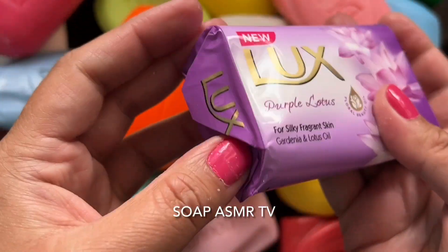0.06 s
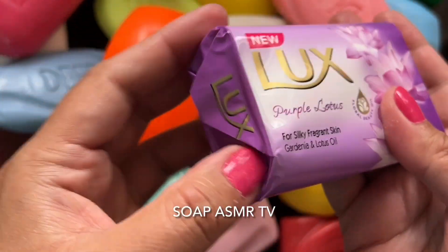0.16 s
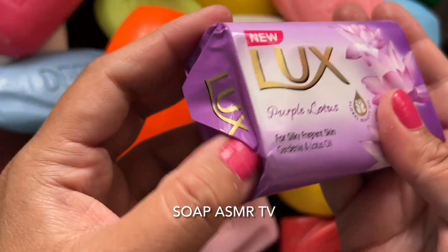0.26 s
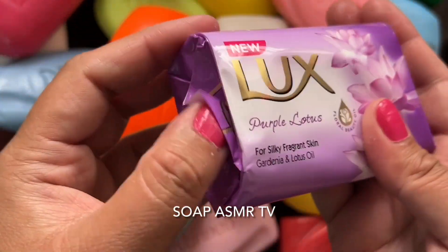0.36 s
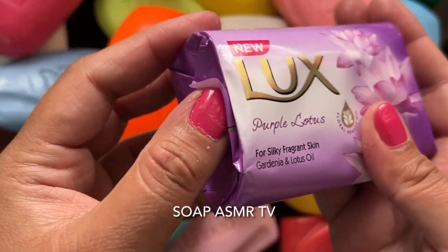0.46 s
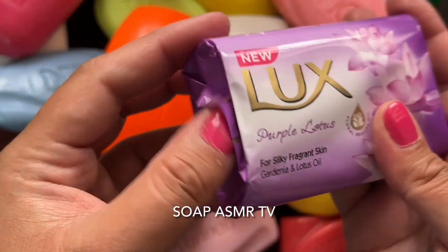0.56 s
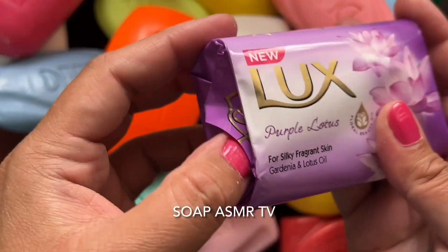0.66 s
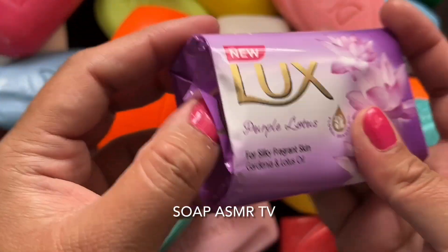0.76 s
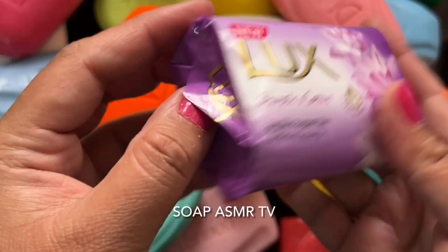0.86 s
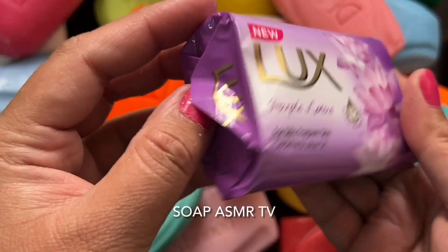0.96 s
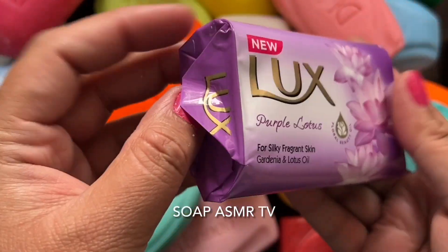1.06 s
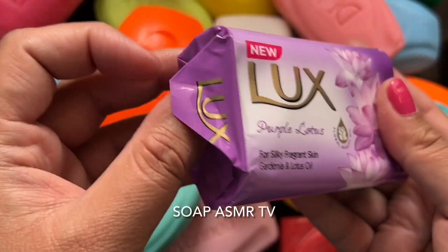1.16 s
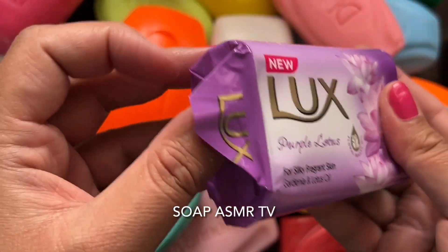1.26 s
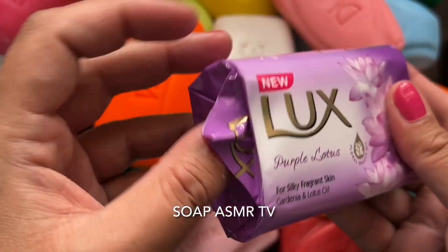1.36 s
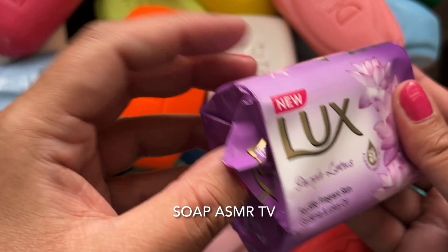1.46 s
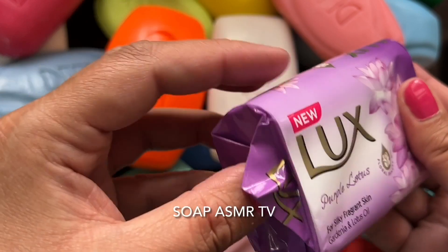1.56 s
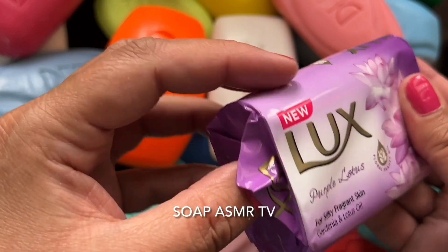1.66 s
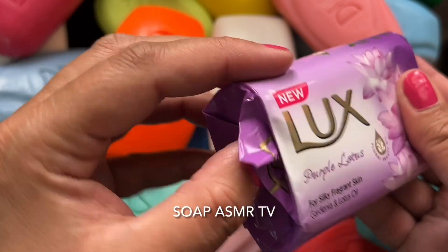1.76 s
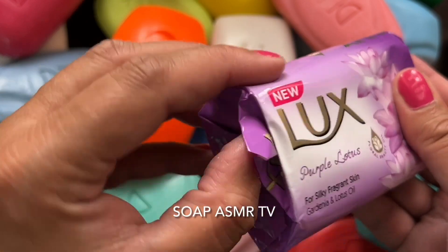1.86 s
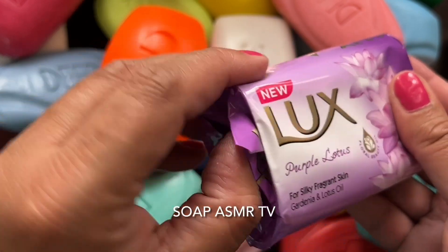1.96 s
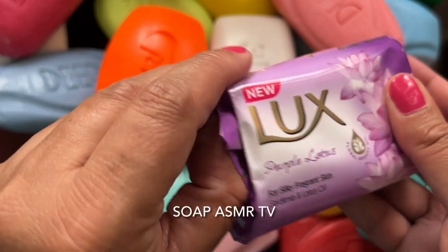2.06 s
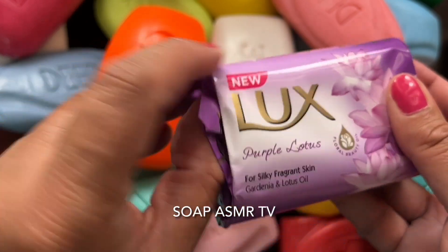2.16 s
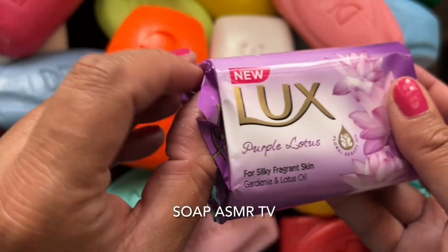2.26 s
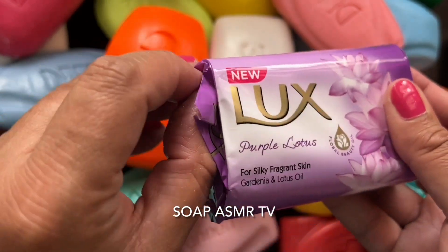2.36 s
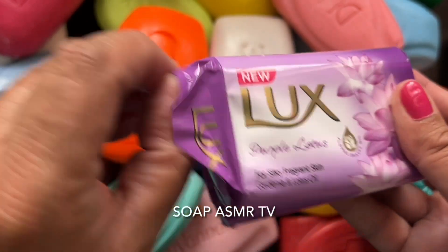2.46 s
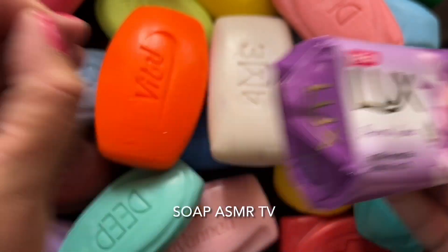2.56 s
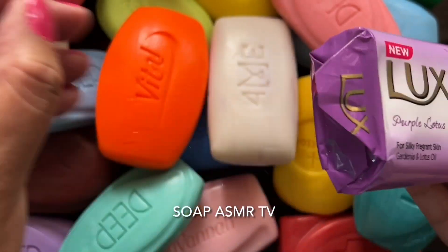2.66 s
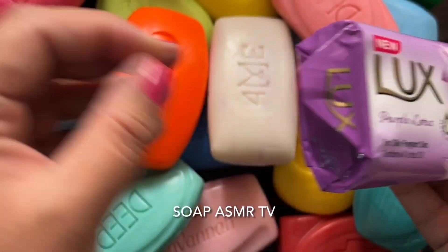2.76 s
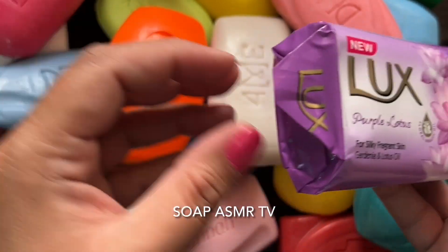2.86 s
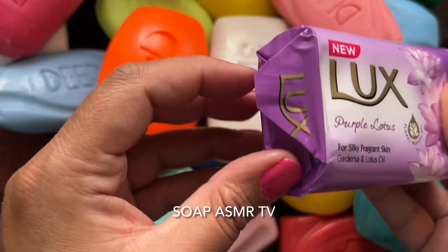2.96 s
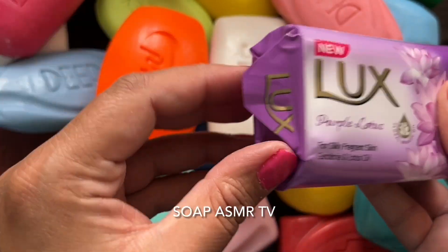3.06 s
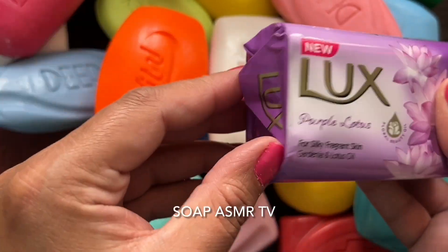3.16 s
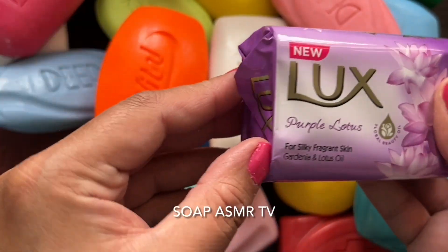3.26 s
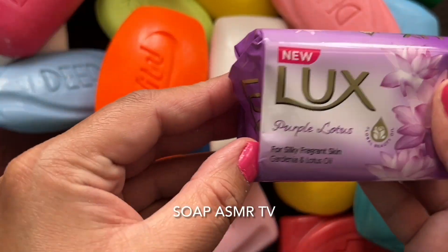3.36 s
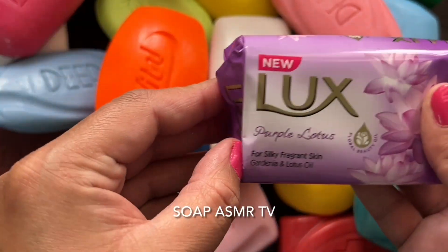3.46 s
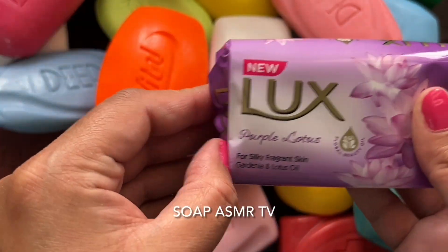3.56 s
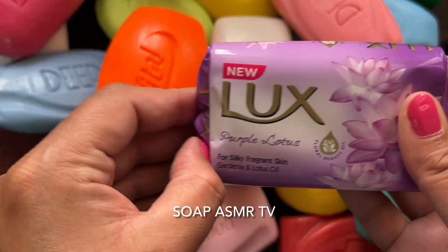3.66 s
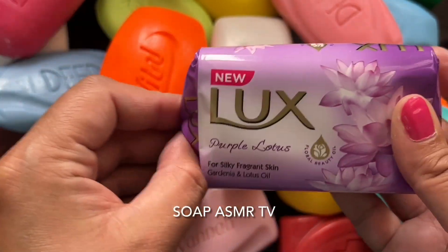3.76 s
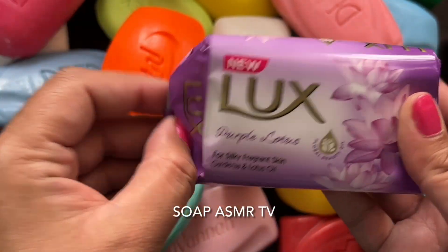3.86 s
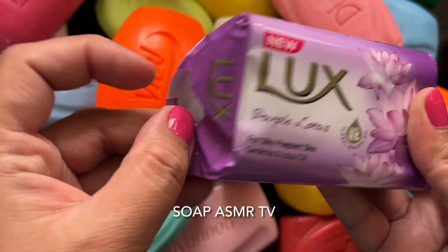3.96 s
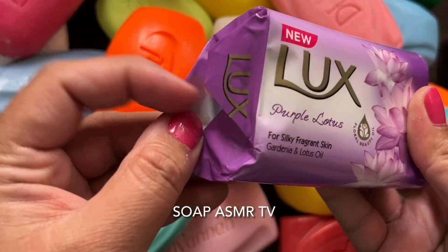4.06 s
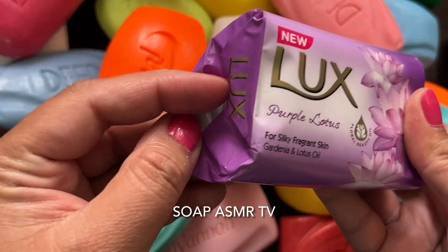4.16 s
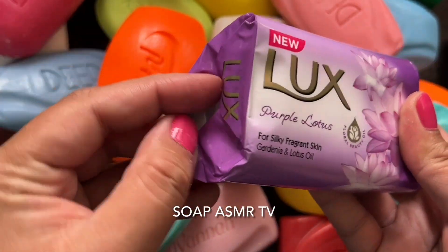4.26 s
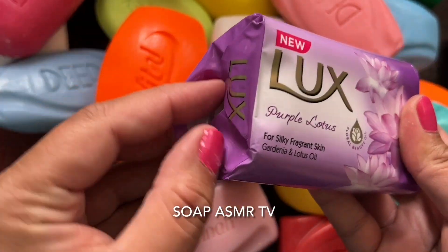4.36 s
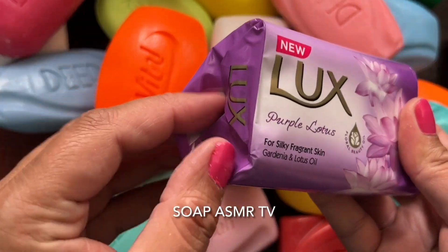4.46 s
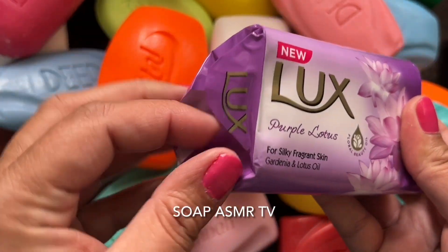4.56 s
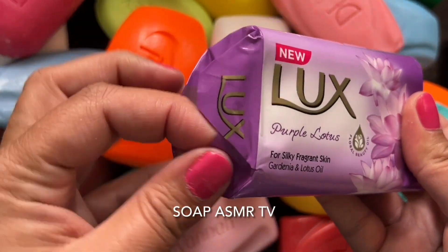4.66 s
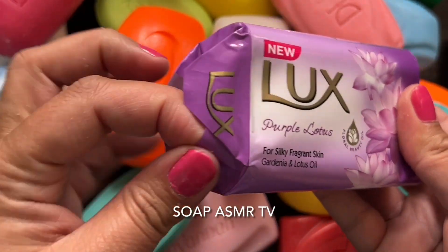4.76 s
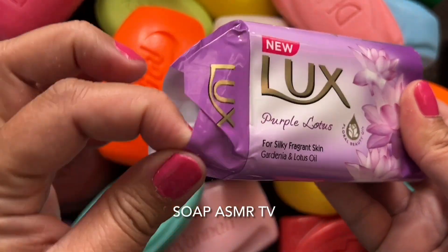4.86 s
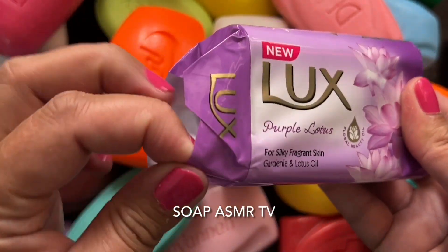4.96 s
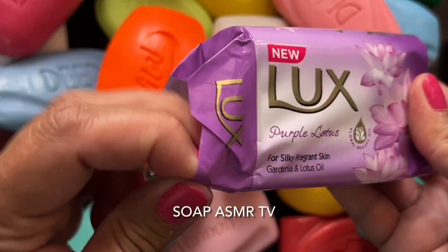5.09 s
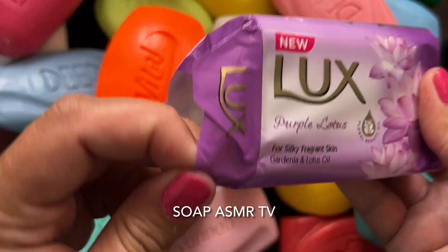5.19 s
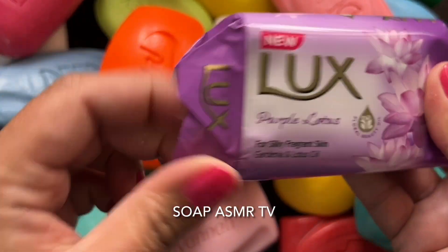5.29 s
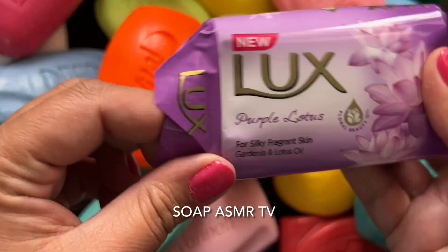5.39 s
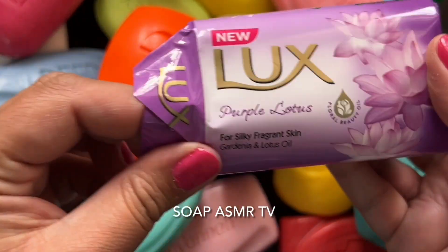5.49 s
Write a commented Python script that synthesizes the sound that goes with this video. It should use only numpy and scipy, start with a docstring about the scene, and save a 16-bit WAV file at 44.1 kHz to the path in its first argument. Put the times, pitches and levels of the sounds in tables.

```python
"""Opening a stiff wrapper

Fingers work open the folded end of a stiff paper and plastic wrapper, close to a two-port microphone.
Creases buckle as noise bursts ringing panel and thud resonances; the flexing sheet rustles in tiny filtered grains.
Seams rip in dense grains, folds crackle, banded noise swells brush by or trail a loud snap, the bar bumps as low modes.
A small hard room adds a decaying noise tail over a low noise rumble; the loudest peaks overload the recorder."""
import sys
import numpy as np
from scipy import signal
from scipy.fft import rfft, irfft, next_fast_len
from scipy.io import wavfile

SR = 44100
rng = np.random.default_rng(int(sys.argv[2]) if len(sys.argv) > 2 else 0)


def waveform_to_disk(signal):
    """Save audio, clipped to [-1, 1], as 16-bit WAV at the path in sys.argv[1]."""
    frames = np.transpose(np.atleast_2d(signal))
    scaled = np.clip(frames, -1, 1) * 32767
    samples = np.round(scaled).astype(np.int16)
    wavfile.write(sys.argv[1], SR, samples)


N = 243873

# the sheet flexing: (time [s], mid rustle level [dB], treble level [dB], low part level [dB])
RUSTLE_CURVE = [(0.0, -35.5, -41, -35), (0.28, -40, -47, -47.5), (0.63, -48, -41.5, -49),
                (1.08, -38, -44, -45), (1.59, -49, -53, -59), (1.8, -43, -47.5, -51), (1.99, -36, -41, -44),
                (2.22, -47.5, -57, -54.5), (2.42, -35, -39.5, -60), (2.55, -49, -46, -38),
                (2.76, -53, -72, -58), (3.02, -55, -58.5, -52), (3.16, -45.5, -51.5, -52),
                (3.59, -45.5, -51, -60), (3.73, -29, -33, -57), (3.8, -32.5, -34, -44),
                (4.05, -45.5, -48, -48), (4.24, -37.5, -35.5, -38.5), (4.5, -34.5, -31.5, -44.5),
                (4.73, -29.5, -21.5, -33), (4.97, -35.5, -40, -40.5), (5.53, -46, -42.5, -48.5)]
# colour of the rustle: (frequency [Hz], density [dB per Hz])
SHEET_COLOUR = [(150, -22.5), (600, -2.5), (1100, -3), (1800, 4.5), (2400, 3.5), (4000, 0), (7300, -8),
                (11000, -14), (16000, -12.5)]
# handling and house rumble: (time [s], level [dB])
RUMBLE_CURVE = [(0.0, -49.5), (0.34, -44), (0.69, -52), (1.08, -43.5), (2.14, -61), (4.31, -59.5),
                (4.7, -46.5), (5.05, -59), (5.27, -57), (5.53, -47)]
# colour of the rumble: (frequency [Hz], density [dB per Hz])
RUMBLE_SPECTRUM = [(15, -51), (30, -13), (55, 0), (110, -3), (160, -6.5), (220, -12.5), (320, -15),
                   (700, -69.5)]
# creases buckling: (time [s], panel pitch [Hz], panel level [dB], crack level [dB], thud pitch [Hz], thud level [dB])
CREASE_SNAPS = [(0.0239, 2100, -13, -12.5, 606, -11.5), (0.0746, 1340, -33, -56, 736, -25),
                (0.1018, 2440, -18, -40, 804, -21), (0.1127, 1840, -8.5, -0.5, 1240, -13.5),
                (0.1745, 2010, -6.5, -12, 520, -17.5), (0.2197, 1970, -20, -35, 760, -20),
                (0.2344, 1760, -21, -35, 860, -21), (0.249, 2300, -7.5, -11, 760, -13.5),
                (0.288, 2100, -34, -21, 1220, -34), (0.2976, 2830, -6, -16, 1236, -33),
                (0.304, 1330, -35, -14, 1220, -12.5), (0.3406, 3680, -3.5, -9, 1210, -11),
                (0.3711, 4200, -41, -7.5, 1120, -30), (0.411, 2230, -22.5, -14, 625, -39),
                (0.4978, 3340, -18, -19, 1070, -28), (0.5154, 1880, -18, -40, 1130, -34),
                (0.5444, 1310, -21, -19, 1340, -16), (0.5635, 1810, -10, -6, 720, -21),
                (0.6952, 2770, -31, -22, 1020, -33), (0.7375, 1600, -75, -29, 800, -60),
                (0.818, 2470, -12.5, -8.5, 1280, -16), (0.8272, 1790, -9.5, -29, 1170, -6.5),
                (0.8469, 1790, -5.5, -8, 1070, -11), (0.8537, 1710, -9, 1.5, 1250, -4.5),
                (0.8612, 2890, -8, -3.5, 845, -14), (0.8829, 2130, -8.5, -30, 1180, -13),
                (0.9767, 2080, -10.5, -7.5, 600, -38), (1.0933, 2400, -1.5, -4.5, 1100, -7.5),
                (1.1161, 2330, -18, -31, 990, -9), (1.1638, 2340, -7, -32, 1190, -8),
                (1.1794, 2170, -3.5, -8, 1210, -6.5), (1.2248, 3670, -14, -12.5, 1330, -12.5),
                (1.3489, 2060, -36, -17, 690, -23.5), (1.3546, 2580, -5, -1.5, 1340, -17),
                (1.4491, 2040, -29, -19, 1160, -34.5), (1.5798, 1950, -30.5, -34, 1150, -27),
                (1.7284, 1680, -30.5, -59, 600, -36.5), (1.7321, 1280, -26, -62, 585, -28.5),
                (1.7486, 2900, -40, -18.5, 590, -54), (1.8283, 1880, -33, -12, 870, -22),
                (1.8335, 2120, 0, 0, 1250, -6.5), (1.8474, 2200, -6, -33, 1220, -34),
                (1.8593, 2780, -18, -18, 1000, -46), (1.9942, 2165, 4, -3.5, 1220, -22),
                (2.0958, 1890, -39, -45, 1140, -26), (2.1321, 2240, -29, -13.5, 1250, -20.5),
                (2.1826, 2370, -42, -34, 1040, -26), (2.356, 2760, -38, -22, 1160, -43),
                (2.3668, 2830, -27, -27, 1290, -49), (2.3893, 1320, -25, -19, 1280, -15.5),
                (2.399, 2830, -9.5, -29, 500, -12.5), (2.4279, 2530, -2.5, -3, 610, -20),
                (2.4353, 2800, -9.5, 3.5, 593, -37), (2.463, 2570, -23, -3.5, 820, -14),
                (2.4716, 3130, -0.5, -9, 1070, -5), (2.4806, 2550, -5.5, -19, 1240, -4),
                (2.5438, 1750, -15.5, -25, 840, -19.5), (2.6372, 1675, -16.5, -39, 927, -9.5),
                (2.7142, 1740, -42, -55.5, 430, -30), (2.9249, 2400, -35, -36, 408, -37),
                (3.053, 1830, -30, -31, 1070, -29), (3.0732, 1900, -15, -14, 1400, -14),
                (3.1327, 2360, -31, -27, 1160, -27.5), (3.159, 3670, -29, -35, 970, -27),
                (3.1699, 2400, -7.5, -13.5, 1050, -15), (3.2013, 1250, -37, -53, 1120, -22.5),
                (3.2276, 1950, -32, -31, 1110, -52), (3.4283, 1430, -25, -69, 1250, -26),
                (3.5546, 3760, -18, -17.5, 1090, -56), (3.6097, 2460, -12, -23, 1300, -30),
                (3.6539, 3550, -7.5, 2.5, 1230, -16), (3.6833, 2620, -1.5, 7.5, 1400, -31),
                (3.692, 2330, -27, -26, 1130, -46), (3.7418, 1590, -9, -16, 1390, -13),
                (3.75, 3070, -6, -4.5, 1244, -30), (3.7627, 2150, -16.5, -31, 1230, -28),
                (3.8095, 1320, -33, -23, 1170, -20.5), (3.8408, 3100, -40, -19.5, 850, -23.5),
                (3.8717, 2020, -14.5, -35, 1110, -14.5), (3.889, 2200, -6.5, -7.5, 1160, -41),
                (3.9057, 2160, -3.5, -6.5, 1065, -4), (3.9276, 2000, -19, -30, 1030, -16.5),
                (3.9436, 2270, -16, -23, 1140, -27), (3.9589, 1840, -20, -26, 820, -37),
                (4.0443, 1950, -24.5, -29, 870, -48), (4.0636, 2000, -11.5, -38, 1210, -12.5),
                (4.079, 2010, -24, -30, 855, -23), (4.0916, 1990, -22, -10.5, 686, -21.5),
                (4.2203, 2870, -13, -5.5, 830, -25.5), (4.2476, 2200, -26, -26, 614, -26),
                (4.2607, 2300, -14, -44, 754, -26), (4.2796, 2760, -14, -4.5, 1260, -42),
                (4.3184, 2650, -2.5, -1.5, 1160, -23), (4.3555, 2380, -8, 1.5, 930, -20.5),
                (4.3613, 2420, -12, -5, 1190, -38), (4.4549, 2320, -12.5, -19, 1000, -19),
                (4.462, 2700, -32, -17, 960, -19.5), (4.4937, 2390, -22, -33, 810, -23),
                (4.516, 2360, -13, -27, 950, -36), (4.5226, 3530, -11.5, -18, 1010, -15),
                (4.599, 4300, -9, -5, 1080, -27), (4.605, 4820, -25, 7, 1020, -27),
                (4.6175, 2100, -1, -3, 1224, -4), (4.6447, 2680, -23, -9, 1070, -25),
                (4.6595, 2640, -16, 1, 1250, -17), (4.668, 1970, -24, -22, 1160, -16),
                (4.6916, 2970, -16.5, -12, 1160, -23), (4.6991, 3000, -21, 6.5, 1270, -13.5),
                (4.7728, 3130, -26.5, 2, 455, -19.5), (4.784, 2810, -5.5, -18, 1290, -32),
                (4.7898, 2920, 1, -1.5, 466, -16.5), (4.7989, 2310, 2, 7, 1320, -6.5),
                (4.8205, 2730, -1, -7, 1020, -4.5), (4.8254, 3070, -2, -17, 1360, -6.5),
                (4.845, 2700, -10, -2, 746, -21), (4.8507, 1900, -6.5, -11, 1310, -12),
                (4.8816, 2720, -3.5, -10, 460, -25), (4.977, 1380, -37, -57, 1180, -9.5),
                (5.1372, 2300, -23, -40, 1230, -24.5), (5.1891, 2560, -6.5, -38, 1250, -12),
                (5.217, 2440, -15, -35, 1190, -20), (5.221, 2710, -28, -31, 825, -29),
                (5.231, 2700, -15.5, -39, 1080, -25), (5.2475, 2480, -9.5, -22, 830, -22),
                (5.2533, 2500, -25, -11, 805, -19.5), (5.2668, 2730, -23, -35, 960, -16),
                (5.2714, 3700, -2.5, -5, 834, -5), (5.3014, 2150, -16, -20, 1230, -13),
                (5.336, 1820, -25, -33, 620, -22), (5.3409, 2260, -9, -24, 1180, -10),
                (5.3474, 1800, -8.5, -5.5, 386, -11), (5.3681, 2200, 4.5, -5, 464, -0.5),
                (5.3847, 2930, -10.5, -15, 1180, -20), (5.4124, 1780, -4, -5.5, 1300, -3.5),
                (5.5232, 2110, -49, -23, 400, -27.5)]
# glued seams ripping, snaps too dense to count: (start [s], length [s], level [dB])
SEAM_RIPS = [(0.256, 0.046, -30), (0.822, 0.061, -25.5), (1.323, 0.02, -33.5), (2.423, 0.026, -11),
             (2.444, 0.021, -14), (3.668, 0.033, -23.5), (4.604, 0.02, -18), (4.763, 0.055, -17.5)]
# a fold opening in a run of small snaps: (start [s], length [s], typical panel level [dB], typical crack level [dB])
FOLD_CRACKLES = [(0.388, 0.05, -56, -30), (1.324, 0.022, -29.5, -25), (1.461, 0.025, -41, -34),
                 (2.366, 0.064, -22.5, -14.5), (3.114, 0.012, -31.5, -38.5), (3.532, 0.04, -57, -49),
                 (3.663, 0.014, -18, -25), (3.83, 0.045, -25.5, -25), (4.526, 0.061, -25, -18.5),
                 (4.642, 0.08, -16.5, -14), (4.741, 0.02, -26, -12.5)]
# banded noise swells: brushes of the film, and the noisy tail dying away after the loud snap near 2.0 s:
# (start [s], rise [s], fall [s], pitch [Hz], level [dB])
NOISE_SWELLS = [(0.656, 0.051, 0.023, 3100, -34), (.77, 0.034, 0.011, 2200, -38),
                (2.0, 0.012, 0.27, 2150, -32.5), (2.01, 0.015, 0.086, 4950, -51.5),
                (2.248, 0.01, 0.025, 5700, -44), (3.011, 0.043, 0.033, 2430, -38),
                (3.52, 0.054, 0.022, 4000, -34)]
# the bar bumps against fingers and palm: (start [s], peak level [dB], pitch [Hz], width [Hz])
BAR_KNOCKS = [(0.853, -25, 350, 250), (1.702, -33.5, 600, 150), (1.728, -24, 560, 99),
              (1.817, -40, 550, 200), (1.836, -41, 400, 200), (2.474, -10.5, 420, 300),
              (2.547, -21, 201, 300), (3.683, -42, 121, 100), (4.096, -29.5, 276, 90),
              (4.608, -43, 128, 120), (4.82, -23, 291, 200), (5.344, -15.5, 390, 150),
              (5.367, -7.5, 334, 400), (5.369, -13.5, 135, 100)]
# decay of the room by pitch: (frequency [Hz], time to fall 60 dB [s], relative level [dB])
ROOM_DECAY = [(150, 0.97, -24.5), (510, 0.46, -24), (1400, 0.81, -25), (3090, 0.61, -28),
              (5540, 0.69, -27.5), (11700, 0.38, -30)]
# phase by which the left port leads: (frequency [Hz], lead [rad])
LEFT_LEAD = [(0, 0), (300, .3), (1300, .3), (1400, 1.2), (1520, 2), (1600, 3.3), (1720, 6.4), (2760, 6.85),
             (4800, 6.35), (5800, 5.45), (6400, 6.05), (6900, 6.1), (7900, 5.4), (10000, 3), (12600, .2),
             (15700, -3), (22050, -3)]
# level difference of the ports: (frequency [Hz], left minus right [dB])
LEFT_OVER_RIGHT = [(60, 0.5), (300, 0), (1200, 2), (1470, -9), (1620, -1.5), (1900, -5), (2300, 0.5),
                   (3500, 0.5), (16000, 0.2)]
# gain of the sound that differs between the ports: (frequency [Hz], gain [dB])
PORT_DIFFERENCE = [(60, -20), (300, -10), (1250, -13.5), (1400, -8.5), (1650, -9), (1800, -22),
                   (6000, -19.5), (12000, -55)]

THUD_RISE_S = 0.00058  # the thud takes a moment to get going
CRACKLE_GAP_S, CRACKLE_SPREAD_DB = 0.0065, 0.5  # typical wait between small snaps; unevenness of their size
CRACKLE_PANEL_HZ, CRACKLE_THUD_HZ = 2600, 1024  # typical pitches
CRACKLE_THUD_DB = -11.5  # typical thud level relative to the panel
CUTOFF_HZ = 16700
SIZE = next_fast_len(N + SR)
HZ = np.maximum(np.arange(SIZE // 2 + 1) * SR / SIZE, 1)  # frequency grid for filtering


def amp(db):
    """Gain of a level in dB."""
    return 10 ** (np.asarray(db) / 20)


def rms_one(x):
    """Scale to rms 1."""
    return x / np.sqrt(np.mean(x ** 2) + 1e-20)


def peak_one(x):
    """Scale to peak 1."""
    return x / np.abs(x).max()


def in_time(rows):
    """Columns of a curve table at every sample."""
    s, *columns = np.transpose(rows)
    return [np.interp(np.arange(N) / SR, s, column) for column in columns]


def at_hz(points, hz, column=1):
    """A spectrum table read on a log-frequency axis."""
    points = np.array(points)
    return np.interp(np.log(hz), np.log(points[:, 0]), points[:, column])


def filtered(x, response):
    """x through a frequency response given on the HZ grid."""
    return irfft(rfft(x, SIZE) * response, SIZE)[..., :N]


def band(x, low_hz, high_hz):
    """Butterworth band-pass."""
    return signal.sosfilt(signal.butter(2, [low_hz, high_hz], "band", fs=SR, output="sos"), x)


def resonance(x, hz, width_hz):
    """Two-pole resonance: a narrower width rings longer."""
    radius = np.exp(-np.pi * width_hz / SR)
    poles = [1, -2 * radius * np.cos(2 * np.pi * hz / SR), radius * radius]
    return signal.lfilter([1, 0, -1], poles, x)


def grains(per_s, spread_db, friction):
    """Tiny buckles at random moments and of uneven size over friction noise, in the colour of the sheet."""
    sizes = amp(spread_db * np.minimum(rng.exponential(1, N), 4)) * rng.choice([-1, 1], N)
    buckles = sizes * (rng.random(N) < per_s / SR)
    rough = rms_one(buckles) + friction * rng.standard_normal(N)
    return rms_one(filtered(rough, amp(at_hz(SHEET_COLOUR, HZ))))


def rustle():
    """The sheet flexing under the fingers; grains come in clumps and the colour shifts as panels change shape."""
    mid_db, treble_db, low_db = in_time(RUSTLE_CURVE)
    clumps = amp(0.71 * rms_one(band(rng.standard_normal(N), 7.8, 110)))
    raw = clumps * grains(900, 5.4, friction=1.0)
    edges = 200 * 2 ** np.arange(0, 6.6, .5)  # half-octave bands
    step = 1500  # samples between random colour shifts
    shifts = rng.standard_normal((len(edges), N // step + 2))
    sheet = 0
    for low_hz, high_hz, shift in zip(edges, edges[1:], shifts):
        drift = np.interp(np.arange(N) / step, np.arange(len(shift)), shift)
        sheet = sheet + band(raw, low_hz, high_hz) * amp(2.5 * drift)
    mid = amp(mid_db) * rms_one(band(sheet, 940, 3040))
    treble = amp(treble_db) * rms_one(band(sheet, 4400, 22000))
    low = amp(low_db) * rms_one(band(sheet, 140, 1090))
    return mid + treble + low


def rumble():
    """Low noise from hands, table and house, unrelated in its two channels."""
    level_db, = in_time(RUMBLE_CURVE)
    low = filtered(rng.standard_normal((2, N)), amp(at_hz(RUMBLE_SPECTRUM, HZ)))
    return amp(level_db) * rms_one(low)


def snaps(rows):
    """A crease flips with one sharp click and a run of smaller slips; panel and thud ring longer than the crack."""
    length = 1600
    t, out = np.arange(length) / SR, np.zeros(N + length)
    chance = rng.standard_normal((len(rows), 3, length))
    chance[:, :, 4] += 3.88 * np.sign(chance[:, :, 4])  # the flip itself
    for (s, panel_hz, panel_db, crack_db, thud_hz, thud_db), noise in zip(rows, chance):
        crack = band(noise[0] * amp(-60 * t / 0.012), 2410, 18800)
        crack += band(0.75 * noise[0, ::-1] * amp(-60 * t / 0.025), 4000, 7300)  # the duller part lingers

        slips = noise[1] * (amp(-60 * t / 0.0067) + 0.36 * amp(-60 * t / 0.04))
        # a soft flip mostly rings the panel, a sharp one is broad
        sharp = amp(min(0, 0.96 * (crack_db - panel_db - 5.5)))
        panel = rms_one(resonance(slips, panel_hz, 0.23 * panel_hz))
        panel = panel + 0.85 * sharp * rms_one(band(slips, 2300, 9000))

        push = noise[2] * amp(-60 * t / 0.016) * (1 - np.exp(-t / THUD_RISE_S))
        thud = rms_one(resonance(push, thud_hz, 113))
        thud = thud + 1.96 * rms_one(band(push, 0.5 * thud_hz, 2.53 * thud_hz))

        at = round(s * SR)
        # the added dB are the crest: how far each part peaks above its table level
        out[at:at + length] += amp(panel_db + 8.5) * peak_one(panel)
        out[at:at + length] += amp(crack_db + 7.5) * peak_one(crack)
        out[at:at + length] += amp(thud_db + 2.5) * peak_one(thud)
    return out[:N]


def rips():
    """A seam tears in dense grains: each rip swells quickly and breaks off."""
    t, pull = np.arange(N) / SR, 0
    for s, length, db in SEAM_RIPS:
        to_edge = np.minimum(t - s, s + length - t)
        pull = pull + amp(db) * np.clip(to_edge / 0.00053, 0, 1)
    return pull * grains(2500, 3.5, friction=.4)


def crackles():
    """Rows of small snaps at uneven gaps, each with a size and pitches of its own."""
    rows = []
    chances = rng.standard_normal((len(FOLD_CRACKLES), 6, 20))
    for (start, length, panel_db, crack_db), chance in zip(FOLD_CRACKLES, chances):
        gap, size, soft, full, high, low = np.clip(chance, -2, 2)
        s = start + np.cumsum(CRACKLE_GAP_S * np.exp(0.4 * gap)) - CRACKLE_GAP_S
        panel_hz = CRACKLE_PANEL_HZ * np.exp(0.073 * high)
        panel = panel_db + CRACKLE_SPREAD_DB * (size + soft)
        crack = crack_db + CRACKLE_SPREAD_DB * size
        thud_hz = CRACKLE_THUD_HZ * np.exp(0.75 * low)
        thud = panel + CRACKLE_THUD_DB + CRACKLE_SPREAD_DB * full
        run = np.transpose([s, panel_hz, panel, crack, thud_hz, thud])
        rows += list(run[(s > 0) & (s < start + length)])
    return rows


def noise_swells():
    """Fine-grained noise that swells and fades, a band around the given pitch over a broad hiss above it."""
    t, out = np.arange(N) / SR, 0
    fine = grains(4500, 2.5, friction=0.75)
    for s, rise, fall, hz, db in NOISE_SWELLS:
        ramp = np.minimum((t - s) / rise, 1 - (t - s - rise) / fall)
        swell = np.clip(ramp, 0, 1) ** 0.76
        pitched = rms_one(band(fine, 0.64 * hz, 1.46 * hz))
        hiss = 0.77 * rms_one(band(fine, hz, 14000))
        out = out + amp(db) * swell * (pitched + hiss)
    return out


def knocks():
    """Soft contacts: a short low push into one damped mode."""
    length = 3000
    t, out = np.arange(length) / SR, np.zeros(N + length)
    noises = rng.standard_normal((len(BAR_KNOCKS), length))
    for (s, db, hz, width_hz), noise in zip(BAR_KNOCKS, noises):
        push = noise * amp(-60 * t / .022) * (1 - np.exp(-t / .002))
        mode = resonance(band(push, 0.5 * hz, 2 * hz), hz, width_hz)
        at = round(s * SR)
        out[at:at + length] += amp(db) * peak_one(mode)
    return out[:N]


def room(x):
    """Diffuse tail: half-octave bands of noise, each dying at its own rate; two unrelated versions."""
    t, tail = np.arange(int(.9 * SR)) / SR, 0
    white = rng.standard_normal((2, 2, len(t)))  # neighbouring bands take turns, so they stay unrelated
    edges = 120 * 2 ** np.arange(0, 7.4, .5)
    for k, (low_hz, high_hz) in enumerate(zip(edges, edges[1:])):
        hz = np.sqrt(low_hz * high_hz)
        decay_db = -60 * t / at_hz(ROOM_DECAY, hz)
        # the tail is noise at every sample, so it starts well under the level of its band
        level_db = at_hz(ROOM_DECAY, hz, column=2) - 22.5
        tail = tail + band(white[k % 2], low_hz, high_hz) * amp(level_db + decay_db)
    onset = 1 - np.exp(-t / 0.0007)
    return filtered(x, rfft(tail * onset, SIZE))


def ports(shared, other):
    """The two ports hear the same sound with a phase and level offset, plus a little that differs."""
    lead = np.interp(HZ, *np.transpose(LEFT_LEAD))
    balance = amp(at_hz(LEFT_OVER_RIGHT, HZ) / 2)  # half the difference on each port
    apart = filtered(other, amp(at_hz(PORT_DIFFERENCE, HZ)))  # opposite sign in each port
    left = filtered(shared + apart, balance)
    right = filtered(shared - apart, np.exp(-1j * lead) / balance)
    return np.array([left, right])


def scene():
    """Wrapper, room and rumble as the two ports take them."""
    wrapper = snaps(CREASE_SNAPS + crackles()) + rustle() + rips() + noise_swells() + knocks()
    tail, low = room(wrapper), rumble()
    # nearby surfaces that each port hears differently return a smeared copy of the wrapper
    smear = rng.standard_normal(130) * amp(-np.arange(130) * 0.028)
    near = signal.lfilter(smear / np.linalg.norm(smear), [1], wrapper)
    shared = wrapper + tail[0] + low[0]
    other = near + amp(8.5) * tail[1] + low[1]
    return ports(shared, other)


def record(dry):
    """Hard overload just under full scale flattens the peaks, then a steep low-pass cuts the top."""
    clipped = np.clip(dry, -.97, .97)
    return signal.sosfilt(signal.cheby2(10, 40, CUTOFF_HZ, fs=SR, output="sos"), clipped)


dry = scene()
out = record(dry)
waveform_to_disk(out)
```